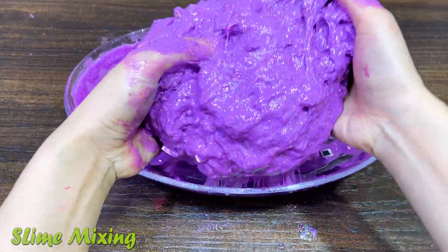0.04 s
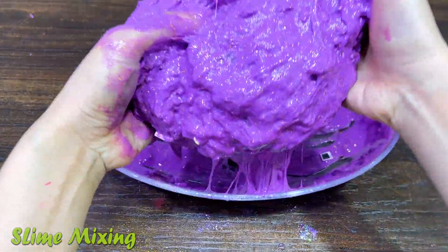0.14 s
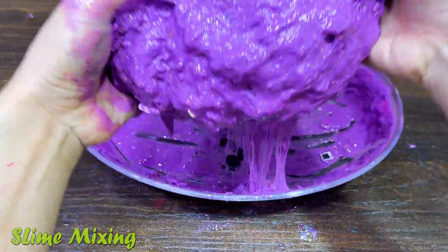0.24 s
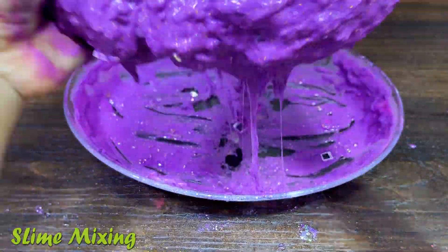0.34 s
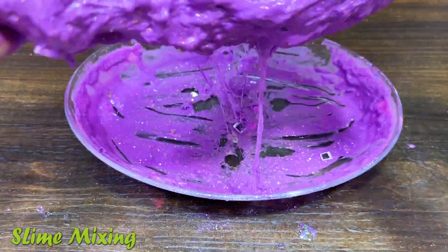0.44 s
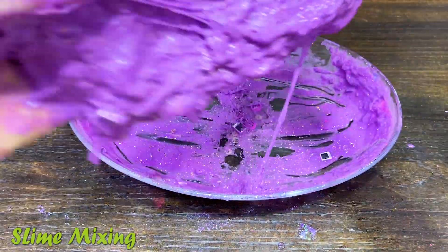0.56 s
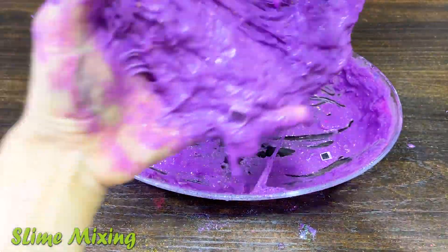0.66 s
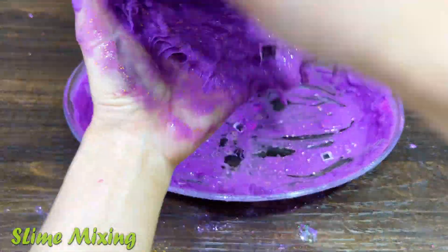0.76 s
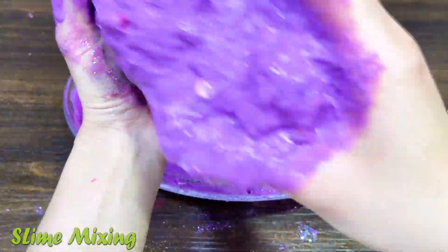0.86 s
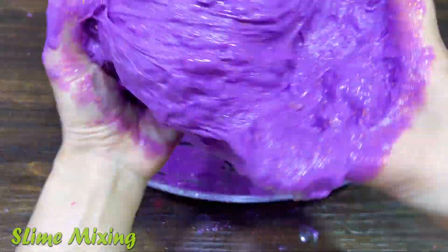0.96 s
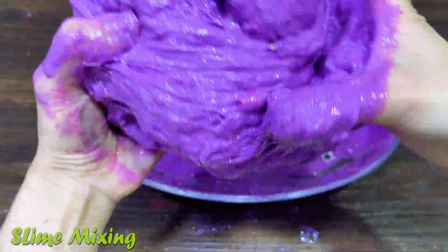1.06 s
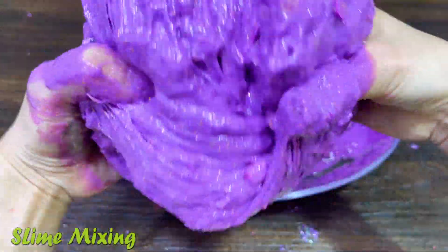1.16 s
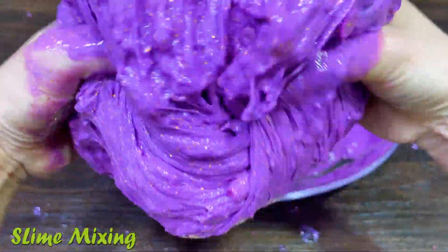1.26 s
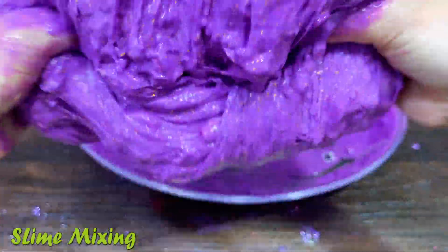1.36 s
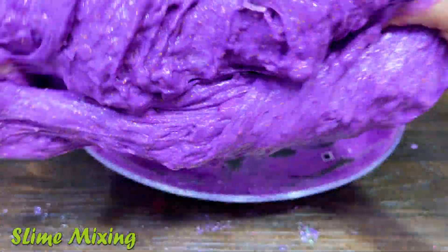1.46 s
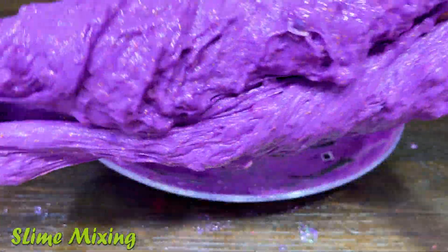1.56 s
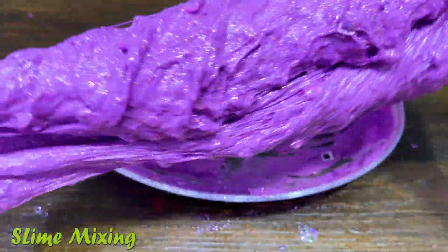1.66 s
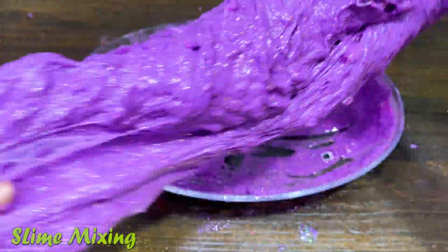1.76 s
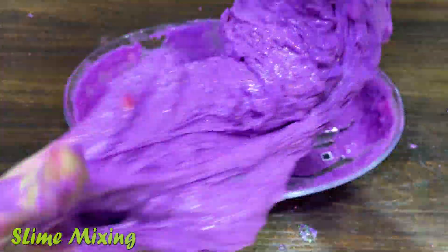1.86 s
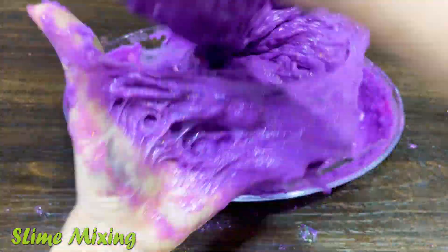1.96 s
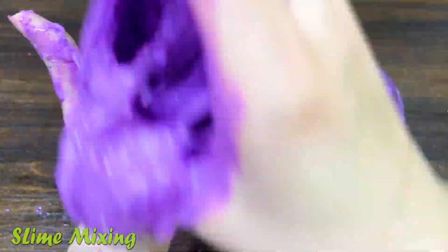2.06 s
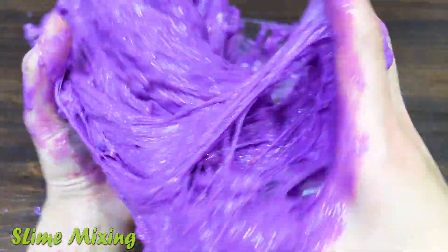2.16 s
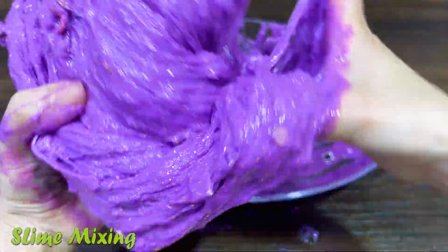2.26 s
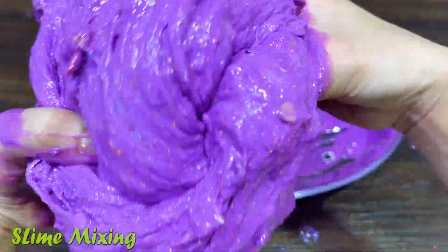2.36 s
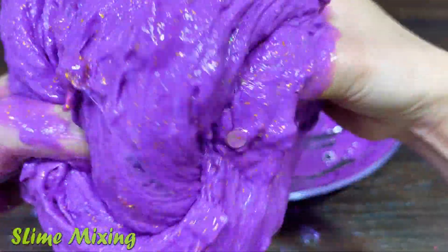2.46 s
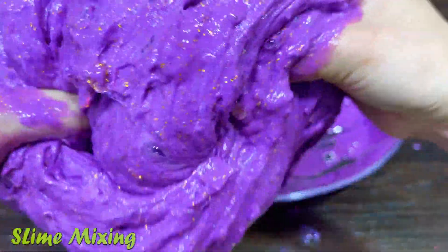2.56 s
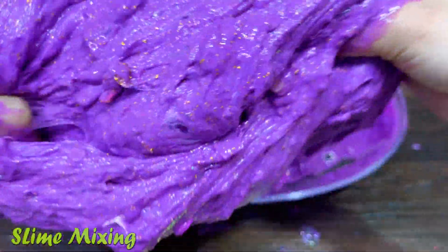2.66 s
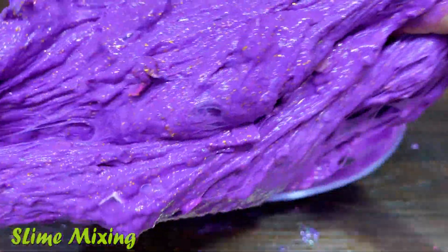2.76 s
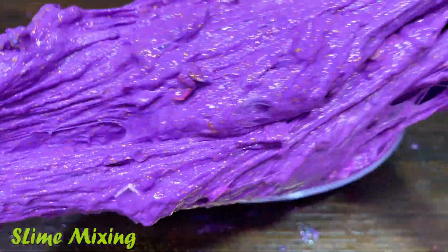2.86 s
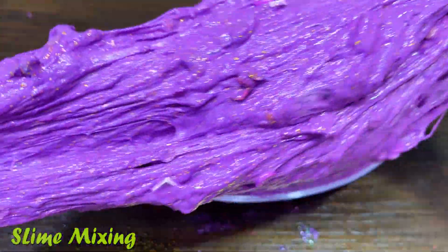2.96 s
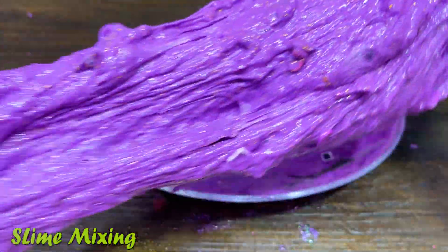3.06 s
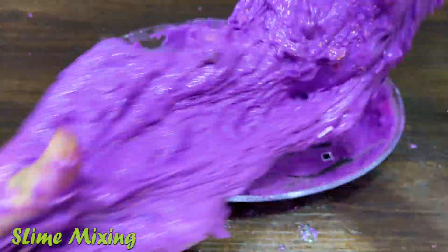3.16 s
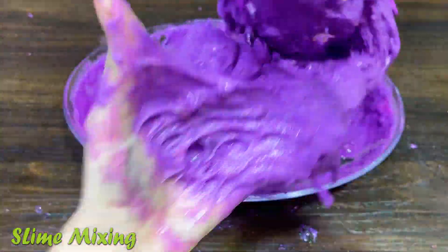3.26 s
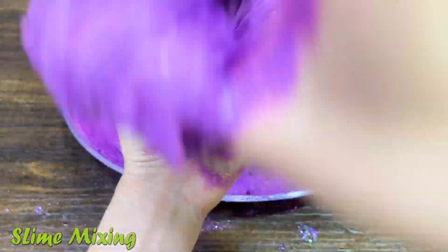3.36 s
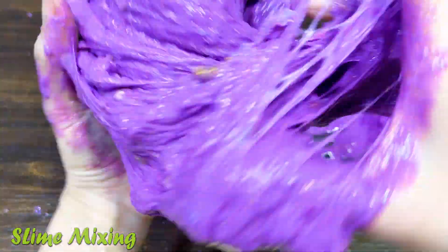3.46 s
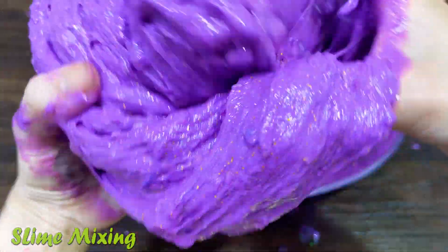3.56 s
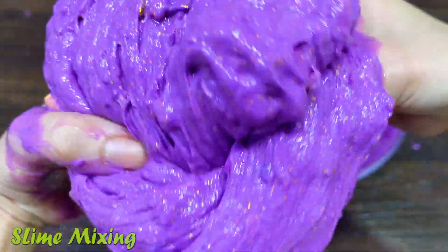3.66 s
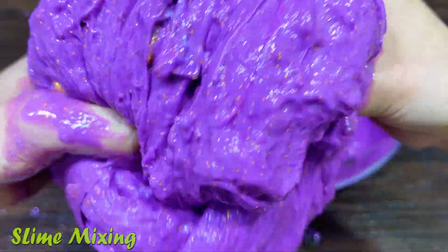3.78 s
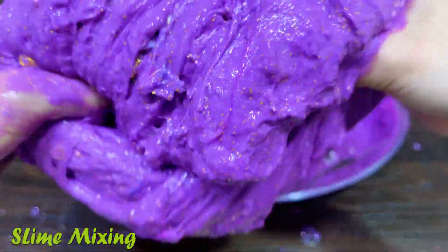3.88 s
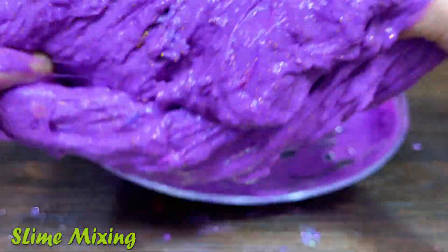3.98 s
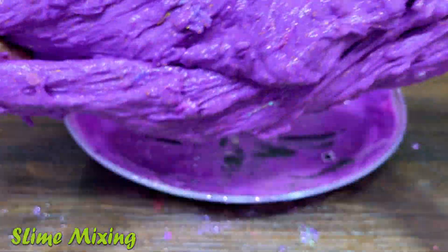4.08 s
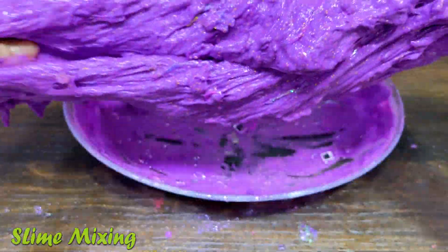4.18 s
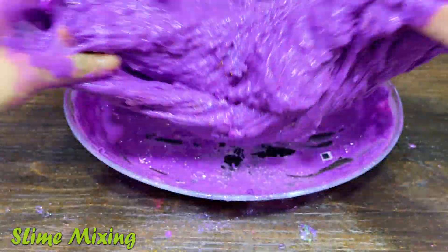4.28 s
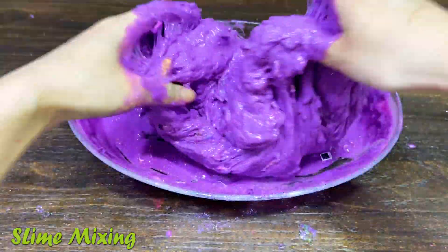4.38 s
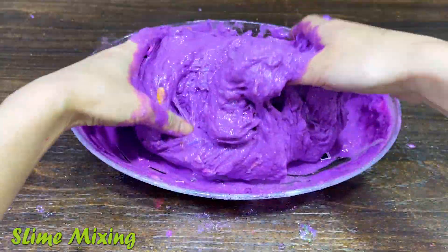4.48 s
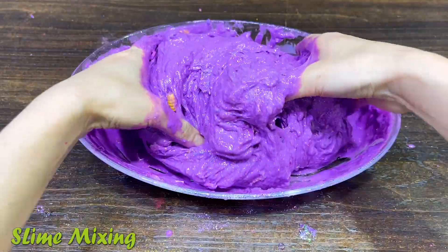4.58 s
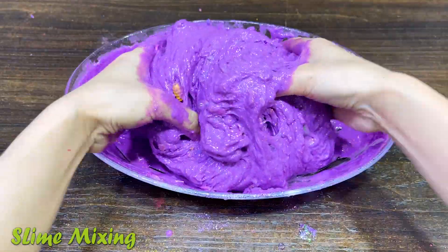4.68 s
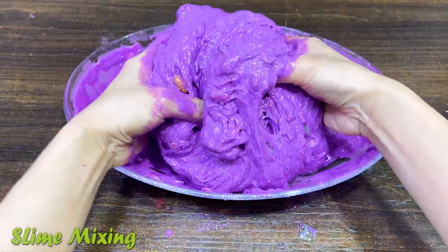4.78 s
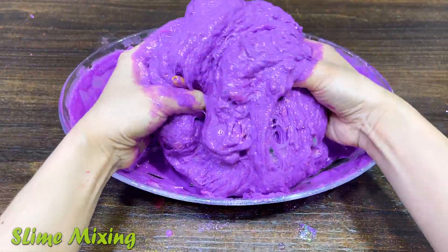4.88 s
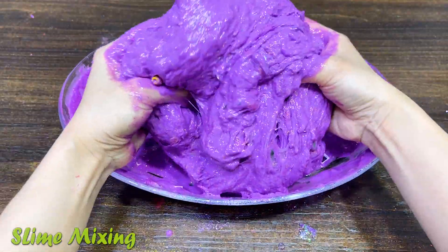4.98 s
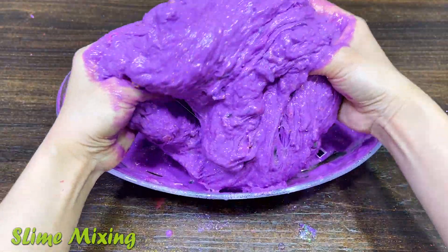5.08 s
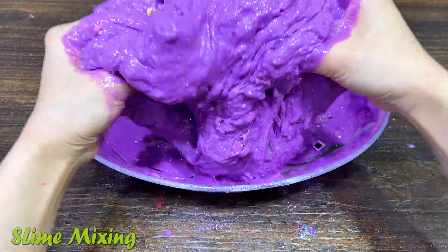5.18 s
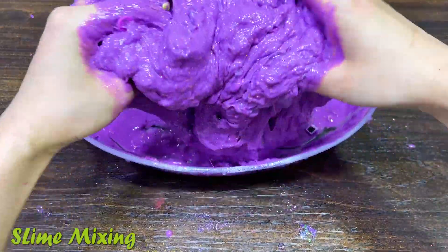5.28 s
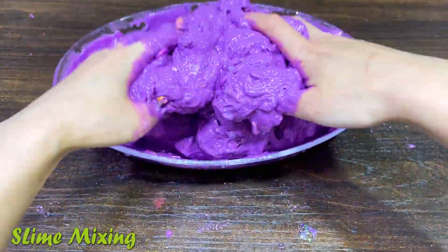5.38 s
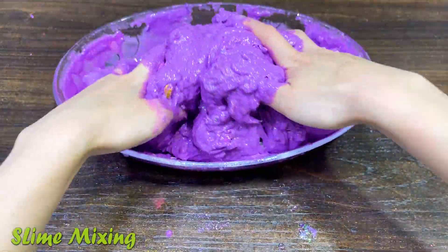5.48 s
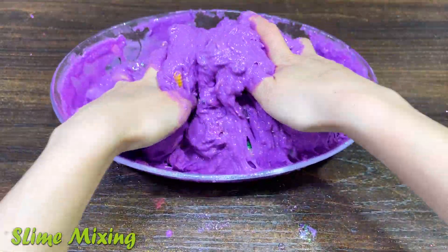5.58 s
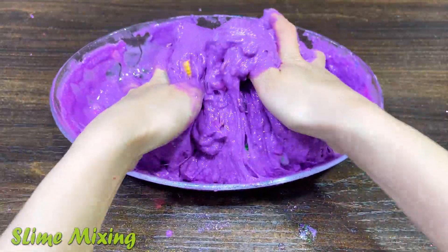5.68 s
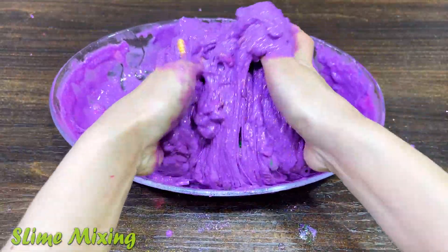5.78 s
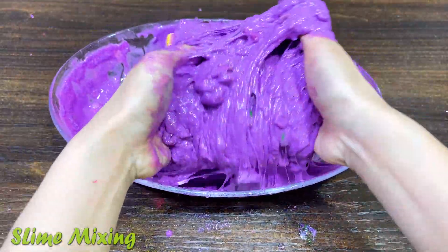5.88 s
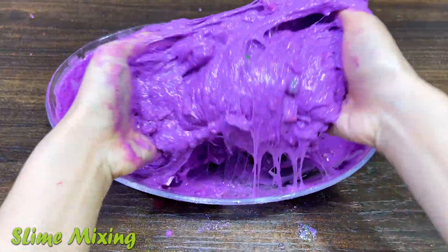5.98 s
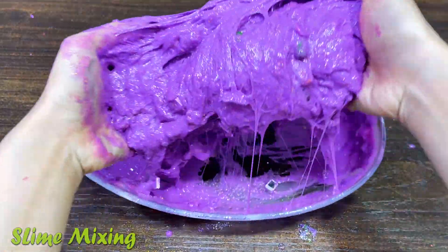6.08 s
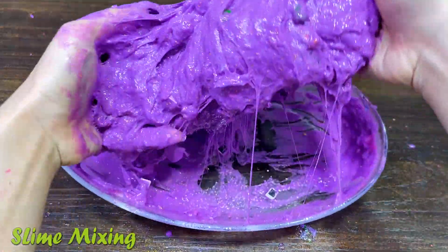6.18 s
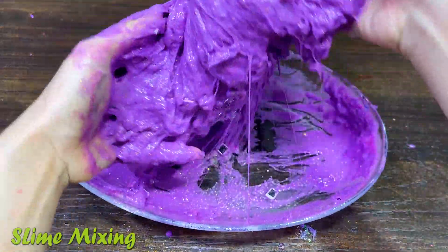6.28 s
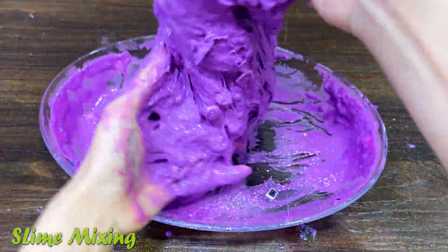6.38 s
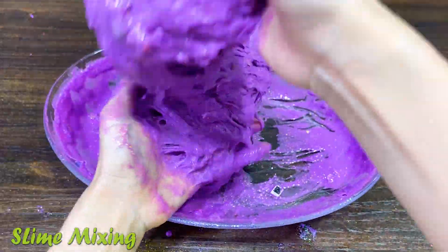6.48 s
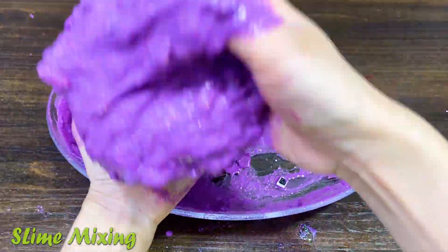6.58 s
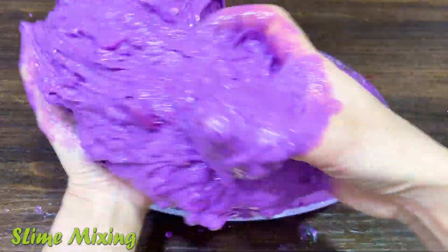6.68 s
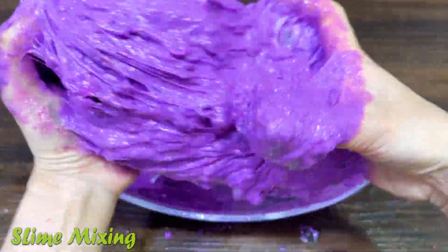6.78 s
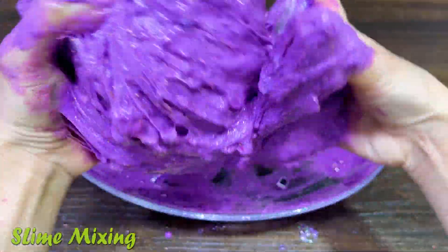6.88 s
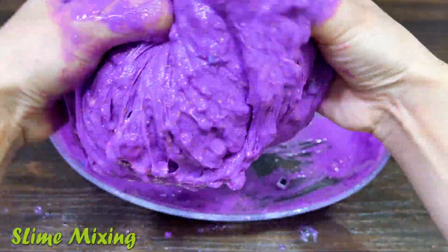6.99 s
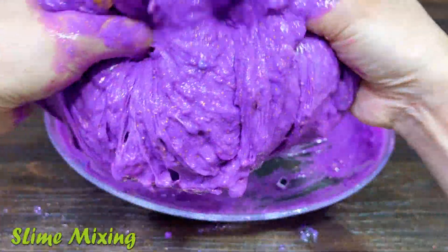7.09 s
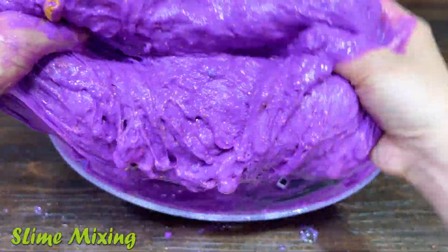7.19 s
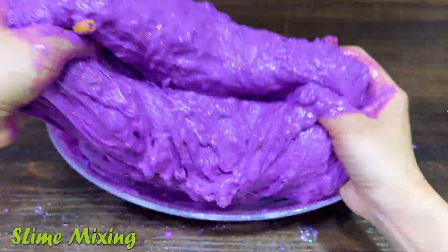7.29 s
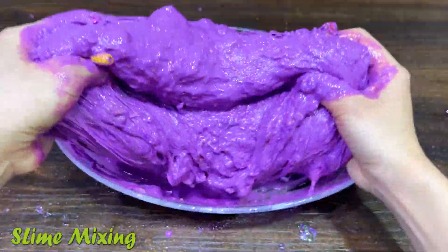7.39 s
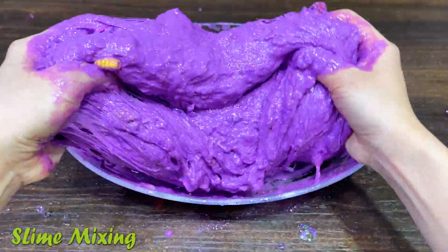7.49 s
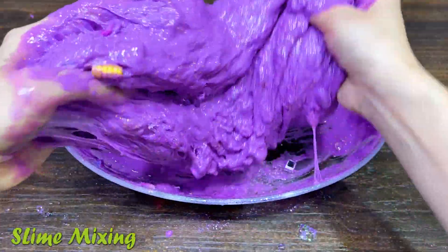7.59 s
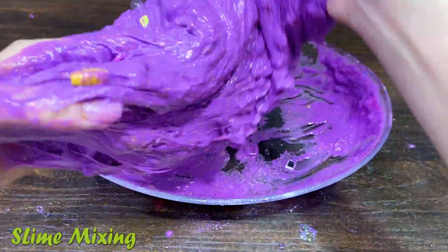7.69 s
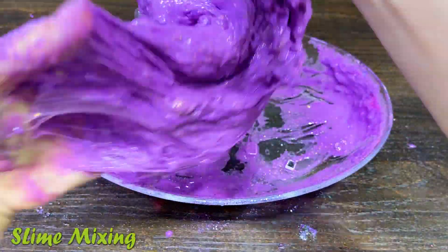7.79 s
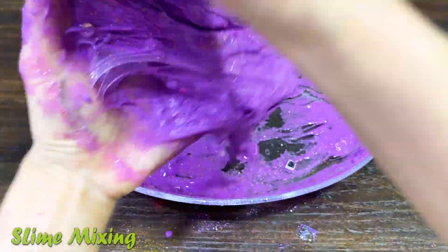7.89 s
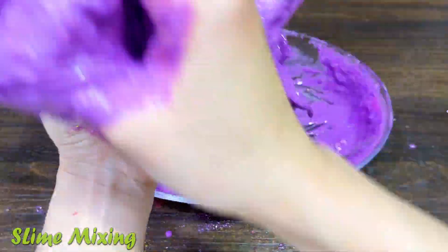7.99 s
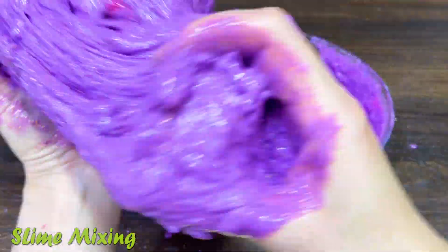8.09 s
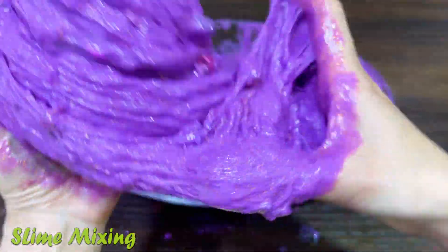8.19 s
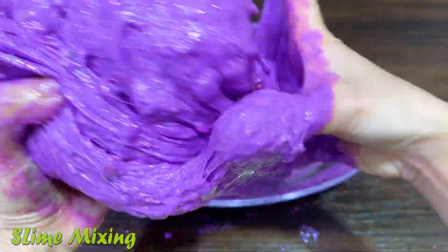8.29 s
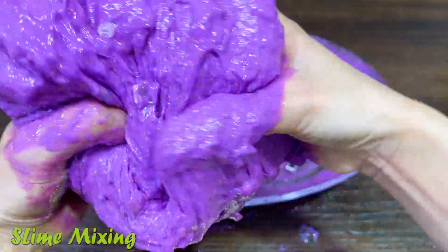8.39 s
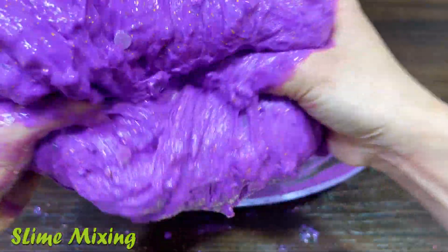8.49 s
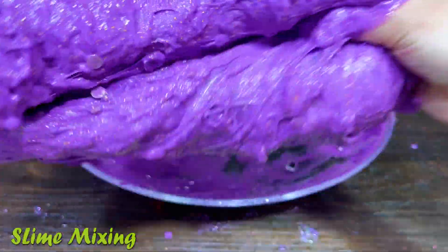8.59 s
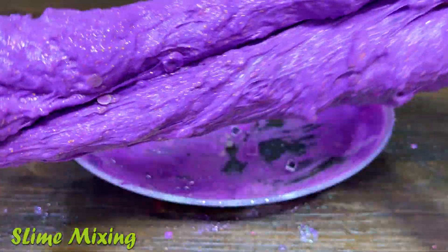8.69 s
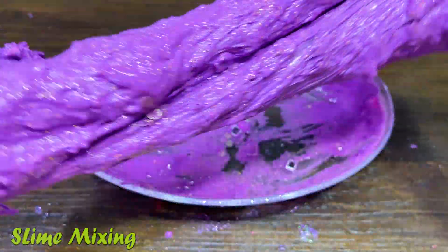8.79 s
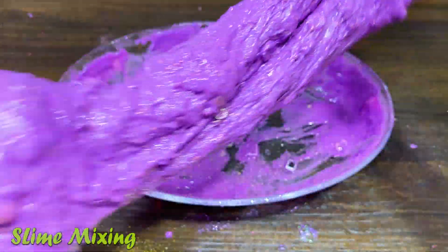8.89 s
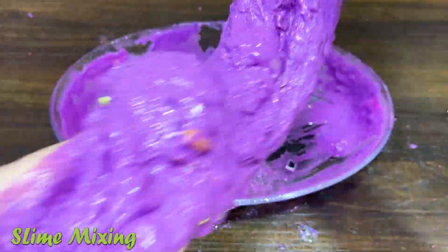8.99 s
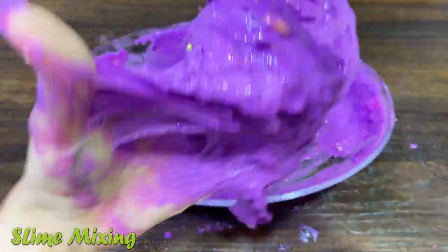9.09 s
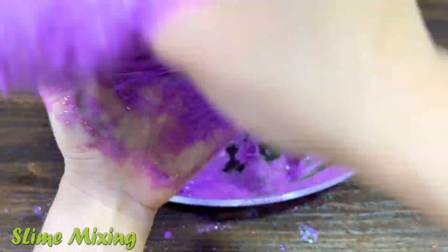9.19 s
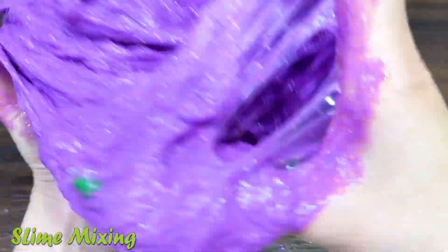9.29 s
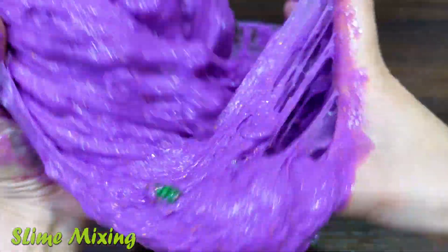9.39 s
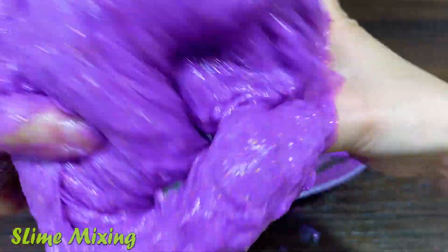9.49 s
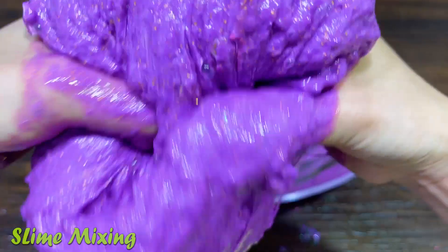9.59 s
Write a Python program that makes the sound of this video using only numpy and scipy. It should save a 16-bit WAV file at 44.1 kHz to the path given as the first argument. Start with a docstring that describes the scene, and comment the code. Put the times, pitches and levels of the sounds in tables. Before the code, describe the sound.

Close, sticky slime crackles, squelches and pops as it is kneaded, with dull thumps and a couple of loud plate clatters.

```python
"""A sticky crackle over a dull squelch: two hands stretch, fold and squeeze slime on a plate, close by.
Air pockets burst with loud snaps and ring as cavity resonators; tearing films and strands add noise.
The plate is pulled up, knocks on the wooden table and rocks, ringing in its damped modes, and buzzes
as slime peels off it. Lumps thump the table, short hollow notes drop in pitch, a small room answers."""
import sys
import numpy as np
from scipy import signal
from scipy.fft import rfft, irfft, next_fast_len
from scipy.io import wavfile
from scipy.ndimage import uniform_filter1d, map_coordinates

SR = 44100
rng = np.random.default_rng(int(sys.argv[2]) if len(sys.argv) > 2 else 0)


def inscribe(sig):
    """Save sig as 16-bit PCM at rate SR to the path in sys.argv[1].

    A 1-D sig is mono; a 2-D sig holds one channel per row.
    Samples are clipped to [-1, 1] before scaling.
    """
    pcm = np.round(np.clip(np.atleast_2d(sig).T, -1, 1) * 32767)
    wavfile.write(sys.argv[1], SR, pcm.astype(np.int16))


N = 425565
CLOCK = np.arange(N) / SR


def amp(db):
    """Amplitude ratio of a level in decibels."""
    return 10 ** (np.asarray(db) / 20)


def along(points, hz):
    """Interpolation of (f/Hz, value) points on a logarithmic frequency axis."""
    f, value = np.transpose(points)
    return np.interp(np.log(hz + 1), np.log(f + 1), value)


def unit_rms(x):
    """Normalisation to a mean power of 1."""
    return x / np.sqrt(np.mean(x ** 2) + 1e-20)


def wobble(rate):
    """Smooth random modulation: a spline through `rate` knots a second."""
    return map_coordinates(rng.standard_normal(int(N * rate / SR) + 4), [CLOCK * rate])


def filtered(x, response):
    """Linear filtering: the spectrum times a complex frequency response."""
    size = next_fast_len(N + SR // 2)
    return irfft(rfft(x, size) * response(np.fft.rfftfreq(size, 1 / SR)), size)[..., :N]


def placed(times, shapes, pan_db):
    """Superposition of short sounds, one a row, each panned by a left-right level difference."""
    at = (np.round(times * SR).astype(int)[:, None] + np.arange(shapes.shape[1])).ravel()
    channels = [shapes * amp(side * pan_db / 2)[:, None] for side in (1, -1)]
    return np.array([np.bincount(at, channel.ravel(), N + SR)[:N] for channel in channels])


def rings(hz, cycles, seconds):
    """Damped oscillations, one a row, whose envelopes peak after `cycles` periods."""
    turns = hz[:, None] * np.arange(round(seconds * SR)) / SR
    return np.sin(2 * np.pi * turns) * turns / cycles * np.exp(1 - turns / cycles)


def rush(spectrum, coherence, lumps_db, rate):
    """Partly coherent stereo noise of rms 1, made lumpy by amplitude modulation."""
    mid, side = filtered(rng.standard_normal((2, N)), lambda hz: amp(along(spectrum, hz)))
    angle = np.arccos(coherence) / 2
    pair = np.cos(angle) * mid + np.sin(angle) * np.array([side, -side])
    return unit_rms(pair * amp(lumps_db * wobble(rate)))


def grains(count, hz, octaves, cycles, spread_db, seconds):
    """Clustered shot noise of rms 1: tiny damped oscillations, few of them large."""
    time_rank, size_rank = rng.random((count, 2)).T
    detune, pan = rng.standard_normal((count, 2)).T
    cumulative_rate = np.cumsum(amp(5 * wobble(25)))
    times = np.interp(time_rank, cumulative_rate / cumulative_rate[-1], CLOCK)
    pitch = np.clip(hz * 2 ** (octaves * detune), 100, SR / 2.6)
    size = amp(-spread_db * np.log(1 - .985 * size_rank))
    return unit_rms(placed(times, size[:, None] * rings(pitch, cycles, seconds), 3 * pan))


def strokes(rows, attack_s, sag_db_per_s, release_db_per_s):
    """Envelopes with a linear rise and an exponential decay that steepens after the hold."""
    gain = np.zeros(N)
    for start, hold, db in rows:
        t = np.clip(CLOCK - start, 0, None)
        released = np.clip(t - hold, 0, None)
        gain += np.clip(t / attack_s, 0, 1) * amp(db - sag_db_per_s * t - release_db_per_s * released)
    return gain


def kneading_db(layer):
    """Slow amplitude envelope that the kneading gives the crackle or the squelch."""
    # course of the kneading: t/s, crackle level/dB, squelch level/dB
    effort = [(0.0, -55.5, -59.5), (0.29, -60.5, -50), (0.62, -66, -69.5), (1.53, -53, -54.5),
              (1.801, -55, -63.5), (2.23, -57, -65), (2.741, -51, -53), (3.44, -57.5, -71.5),
              (3.84, -54.5, -55), (4.46, -54, -60.5), (4.94, -54, -52.5), (5.0, -50, -49.5),
              (6.15, -53.5, -53), (6.29, -59.5, -63), (8.01, -60, -66), (8.6, -55.5, -57.5),
              (9.11, -60, -64.5), (9.65, -55.5, -55.5)]
    times, crackle_db, squelch_db = np.transpose(effort)
    return np.interp(CLOCK, times, {"crackle": crackle_db, "squelch": squelch_db}[layer])


def rest_db(fade_s=.015):
    """The excitation weakens, and the level dips, while the hands rest."""
    # pauses: t/s, duration/s, depth/dB
    rests = [(0.292, .08, 17.5), (0.73, 0.055, 5.5), (3.127, 0.043, 11), (3.332, 0.042, 11),
             (3.672, .038, 17), (4.247, 0.029, 13), (4.329, 0.056, 16), (4.582, 0.033, 10), (5.167, 0.1, 5),
             (5.499, 0.026, 10.5), (5.684, 0.018, 6), (6.353, 0.11, 12.5), (7.298, 0.086, 9.5),
             (7.583, 0.046, 18.5), (9.166, 0.08, 5.5)]
    level_db = np.zeros(N)
    for start, length, depth_db in rests:
        inside_s = np.minimum(CLOCK - start, start + length - CLOCK)
        level_db -= depth_db * np.clip(inside_s / fade_s + .5, 0, 1)
    return level_db


def crackle():
    """Shot noise of countless tiny bursting pockets, over the fizz of tearing film."""
    # spectrum of tearing film: f/Hz, relative spectral level/dB
    film = [(1000, -21.5), (2500, 1), (4000, -2), (9000, -11), (16500, -0.5)]
    ticks = grains(count=6000, hz=8500, octaves=.8, cycles=.7, spread_db=4.8, seconds=.002)
    fizz = rush(film, coherence=.75, lumps_db=6, rate=85)
    return amp(kneading_db("crackle") + rest_db()) * (ticks + fizz)


def squelch():
    """Heavily damped cavities: larger pockets cave in dully inside the paste."""
    # spectrum of the paste: f/Hz, relative spectral level/dB
    paste = [(100, -19.5), (200, -6.5), (330, 0), (450, -2.5), (900, -17), (1500, -8), (3000, -33.5)]
    gulps = grains(count=6000, hz=1700, octaves=.7, cycles=.45, spread_db=4.5, seconds=.003)
    smear = rush(paste, coherence=.9, lumps_db=5.5, rate=28)
    return amp(kneading_db("squelch") + .99 * rest_db()) * (amp(-3.5) * gulps + amp(2) * smear)


def table_rumble():
    """Forced vibration: the arms shake the table; it swells after knocks and thumps and during rocking."""
    # spectrum of the table: f/Hz, relative spectral level/dB
    wood = [(20, -54), (35, -37), (60, -0.5), (100, -0.5), (170, -1), (300, -58.5)]
    # swells of low rumble: t/s, hold/s, level/dB
    rumbles = [(0.15, 0.058, -42.5), (4.86, 0.28, -24.5), (5.55, 0.34, -46), (8.42, 0.72, -61)]
    squelch_db = kneading_db("squelch")
    shake = amp(-64 + .25 * (squelch_db - squelch_db.mean()))
    swells = strokes(rumbles, attack_s=.011, sag_db_per_s=18, release_db_per_s=143.5)
    return (shake + swells) * rush(wood, coherence=.9, lumps_db=4.5, rate=9)


def thuds():
    """Impact excitation: lumps and the rocking plate thump the table, higher thumps with more slap."""
    # blows on the table: t/s, level/dB, f/Hz
    blows = [(0.043, -20.5, 105), (0.056, -25, 96), (0.085, -36.5, 89), (1.999, -47.5, 84),
             (3.401, -42.5, 160), (3.62, -33.5, 103), (4.611, -26, 157), (4.859, -24, 170),
             (4.89, -21.5, 96), (4.925, -17.5, 128), (4.959, -24.5, 68.9), (4.995, -17.5, 151.2),
             (5.028, -23.5, 78.6), (5.059, -18.5, 147), (5.098, -14, 104), (5.171, -18, 121.3),
             (5.221, -33.5, 67.6), (5.399, -30, 190), (5.421, -27.5, 190), (5.744, -24.5, 213),
             (6.16, -25, 220), (6.499, -34, 82), (7.406, -33.5, 81.4), (8.423, -30.5, 88.8),
             (8.658, -39, 77)]
    times, db, hz = np.transpose(blows)
    swell = np.arange(round(.12 * SR)) / SR / .0099
    noise = rng.standard_normal((len(times), len(swell)))
    dull_noise = uniform_filter1d(uniform_filter1d(noise, size=48), size=48)
    slap = amp(8.5) * dull_noise * swell * np.exp(1 - swell)
    slap -= uniform_filter1d(slap, size=260)  # high-pass
    thump = rings(hz, cycles=.65, seconds=.12) + (hz[:, None] / 160) ** 2 * slap
    return placed(times, amp(db)[:, None] * thump, rng.normal(1, 2.5, len(times)))


def snaps():
    """Cavity resonance: the skin cracks, a spray follows, and the open pocket rings for a few cycles."""
    # bursting pockets: t/s, level/dB, pocket f/Hz, relative crack level/dB
    bursts = [(0.0617, -29, 7490, -9.5), (0.4482, -32, 7820, -1), (0.5611, -35, 4650, -1.5),
              (0.8082, -30, 6290, -23.5), (0.8125, -25, 6260, -20), (0.8416, -25, 5020, -20),
              (0.9224, -23, 2890, -23), (0.9548, -23.5, 8200, -18), (1.061, -19, 1970, -12),
              (1.0838, -22.5, 5990, -11), (1.1467, -14.5, 2550, -47), (1.2201, -28, 5440, -14.5),
              (1.2379, -27.5, 5930, -7.5), (1.405, -24, 4600, -28.5), (1.62, -10.5, 4170, -3.5),
              (1.6347, -22, 7560, -1), (1.689, -27.5, 2720, -10), (1.7173, -19.5, 5150, -11.5),
              (1.7246, -27.5, 8600, 0), (1.8462, -29.0, 8570, -4.5), (2.0441, -29, 1280, -8),
              (2.171, -25.5, 7900, -6), (2.2528, -19.5, 7400, -10.5), (2.2571, -28.5, 3960, -16),
              (2.363, -27, 3030, -7.5), (2.4011, -22, 1890, -21), (2.5028, -26.0, 6890, 0),
              (2.5423, -23, 8790, -2), (2.5923, -26.5, 7020, -4), (2.9106, -26.0, 2800, -5),
              (2.918, -24, 2800, -5), (3.1819, -30, 7600, 1.5), (3.2049, -23, 8250, -2),
              (3.2619, -27, 5400, -6.0), (3.2801, -26, 2410, -11), (3.2849, -23.5, 2350, -18),
              (3.6148, -21.5, 2200, -5.5), (3.7135, -17.5, 1295, -6), (3.7383, -19, 1830, -30.0),
              (3.7838, -27.5, 1060, -3), (3.9514, -33.5, 2430, -3), (4.0543, -28.5, 7470, -6),
              (4.0745, -23, 4000, -7), (4.1056, -24, 1680, -27.5), (4.2913, -30.0, 1530, -10.5),
              (4.3001, -24, 4840, -22.5), (4.3357, -27.5, 5700, -16.5), (4.402, -32, 2500, -0.5),
              (4.4381, -26, 5710, -14), (4.4692, -44, 6040, -12), (4.6085, -21, 5270, -24),
              (4.7427, -23.5, 7920, -6.5), (4.7853, -28.5, 3340, -16), (4.8225, -28, 2480, -22.5),
              (4.8616, -22, 2390, -9), (4.898, -16, 1700, -8), (5.0598, -16, 7410, -13),
              (5.2611, -24.5, 6400, -3), (5.2896, -18.5, 4600, -8.5), (5.3221, -20, 2350, -28.0),
              (5.368, -21, 1420, -10.0), (5.3797, -17, 1490, -10), (5.5387, -18, 2240, -8.0),
              (5.5573, -18.5, 8720, -3), (5.5625, -18, 2840, -19.0), (5.5796, -17, 1550, -19),
              (5.6555, -27.5, 5100, -25.0), (5.7218, -9, 2420, -11.0), (5.7499, -17.5, 2360, -4),
              (6.0147, -14.5, 3020, -12), (6.1438, -20, 900, -26.0), (6.1583, -7.5, 2050, -11.5),
              (6.226, -18, 2390, -13), (6.3144, -24, 3500, -36), (6.3625, -30.5, 4660, -4.5),
              (6.4746, -20.5, 8600, -12), (6.4908, -15, 1590, -7.5), (6.5719, -21.5, 1620, -6),
              (6.608, -22.5, 1260, -4.5), (6.6572, -20.5, 4350, -25.5), (6.6775, -23, 4240, -32.5),
              (6.8087, -29, 4800, -1.5), (6.8859, -24, 2100, -32), (7.0875, -21.5, 8600, -1.5),
              (7.1296, -25, 1430, -3), (7.1711, -24.0, 8790, -3), (7.1952, -30, 8100, 8),
              (7.1989, -18.5, 6900, -20), (7.2209, -24, 5040, -11), (7.2275, -26.5, 5940, 0),
              (7.2311, -25, 4820, -29), (7.3915, -13.5, 1510, -16.5), (7.3959, -17, 1460, -17),
              (7.4528, -17, 1490, -10), (7.5055, -16, 1260, -10.5), (7.6175, -31.5, 1290, -46),
              (7.6495, -34.5, 5700, -1), (7.6831, -23.5, 8790, -3), (7.703, -22.5, 2200, -9),
              (7.8037, -32.5, 3650, -10.5), (8.0828, -33, 7760, -1.0), (8.1508, -28, 2240, -13),
              (8.213, -26.5, 3120, -5), (8.2357, -29, 3270, -2.5), (8.4005, -20, 5000, -4),
              (8.4367, -18.5, 1450, -36), (8.598, -30, 3170, -27), (8.701, -26.5, 6780, -9.0),
              (8.7137, -24.5, 6700, -4), (8.795, -20.5, 1640, -26), (8.9403, -28.5, 5750, -20.0),
              (9.0118, -34, 3970, -9.5), (9.3889, -26, 6400, -1.5), (9.3916, -30, 8790, 2),
              (9.4368, -30, 1060, -3.5), (9.5478, -24.5, 8790, -1), (9.5825, -19, 1800, -16),
              (9.6136, -10.5, 8000, -1)]
    times, db, hz, bright_db = np.transpose(bursts)
    t = np.arange(SR // 50) / SR
    noise = rng.standard_normal((len(times), 2, len(t)))
    pan_db = .37 + 1.2 * noise[:, 0, 0]
    swell = t / .00062
    spray = swell ** 2 * np.exp(2 - 2 * swell) + amp(-9.5 - 60 * t / .022) * np.tanh(swell)
    pocket_share = np.sqrt(np.clip(1 - amp(2 * bright_db), .03, 1))  # what the crack leaves
    splash = amp(-3 + .15 * bright_db)[:, None] * noise[:, 0] * spray  # softer crack, purer note
    turns = hz[:, None] * t
    ring = np.sin(2 * np.pi * turns) * np.tanh(1.5 * turns) * amp(4 - 6 * turns)
    pocket = placed(times, (pocket_share * amp(db - 3))[:, None] * (ring + splash), pan_db)
    pocket = filtered(pocket, lambda f: 1j * f / (700 + 1j * f) / (1 + (f / 9000) ** 8))
    crack = placed(times, amp(db + bright_db - 1.5)[:, None] * noise[:, 1] * spray, pan_db)
    return pocket + filtered(crack, lambda f: 1 / (1 + (9000 / (f + 1)) ** 8))


def fizz_rushes():
    """Broadband noise in short rushes: the bright spray after the plate's slap, then tearing sheets."""
    # spectrum of the fizz: f/Hz, relative spectral level/dB
    spectrum = [(900, -14.5), (1500, -9), (2800, -4.5), (4500, -5), (9000, -4), (16500, -5.5)]
    # rushes of fizz: t/s, hold/s, level/dB
    rushes = [(0.15, 0.052, -40), (1.385, .05, -52.5), (1.62, 0.037, -50.5), (2.6, 0.49, -52.5),
              (3.645, 0.0074, -47), (3.735, 0.027, -43), (3.797, 0.0067, -43.5), (8.25, 0.013, -45),
              (8.7, 0.15, -55.5), (9.06, 0.023, -54.5)]
    ticks = grains(count=9000, hz=3500, octaves=.8, cycles=1.1, spread_db=3.5, seconds=.002)
    fizz = rush(spectrum, coherence=.8, lumps_db=3.5, rate=170)
    return strokes(rushes, attack_s=.005, sag_db_per_s=5.5, release_db_per_s=303.5) * (fizz + ticks)


def plate_knocks():
    """Modal ringing: each knock excites the plate's modes at new strengths; low modes build up later."""
    # the plate meets the table: t/s, level/dB, spectral tilt about 1 kHz/(dB per octave)
    impacts = [(0.1514, -2.5, -0.5), (0.1546, -5.5, -2), (0.178, -5, -1.5), (0.187, -10.5, -4),
               (0.218, -30.5, 2.5), (5.0903, -1.5, 1.5), (6.142, -21, -5), (6.159, -29, 7),
               (6.488, -31, -5), (7.411, -18, -3)]
    # modes of the plate: f/Hz, level/dB, T60/s
    plate_modes = [(220, -5, 0.031), (347, -3.5, 0.045), (554, 1, 0.018), (745, -1.5, 0.015),
                   (900, -6, 0.026), (1177, -10, 0.035), (1370, 4, 0.01), (1860, -2.5, 0.01),
                   (2040, 8, 0.0037), (3140, -13, 0.0097)]
    rocking = [(.259 + k * .0356, -38 - k * 2.2, -6) for k in range(7)]  # on its rim after the drop
    times, db, tilts_db = np.transpose(impacts + rocking)
    hz, mode_db, t60 = np.array(plate_modes).T[:, :, None]
    t = np.arange(SR // 4) / SR
    envelopes = amp(mode_db - 60 * t / t60) * (1 - np.exp(-t * hz / .8))
    ringing = []
    for tilt_db in tilts_db:
        strengths = amp(rng.normal(0, 1, hz.shape) + tilt_db * np.log2(hz / 1e3))
        sines = np.sin(2 * np.pi * (hz * t + rng.random(hz.shape)))
        ringing.append(np.sum(envelopes * strengths * sines, axis=0))
    noise = uniform_filter1d(rng.standard_normal((len(times), len(t))), size=5)
    rattle = .52 * amp(-60 * t / .023) * noise
    return placed(times, amp(db)[:, None] * (ringing + rattle), np.zeros(len(times)))


def hollow_notes(landing_hz=322.7, overshoot=1.6, fall_s=.0021, t60_s=.06):
    """Damped downward chirps: each hollow note starts high, drops within a cycle or two and dies."""
    # hollow notes: t/s, level/dB
    onsets = [(1.385, -35.5), (1.417, -39), (2.616, -43), (2.726, -37), (3.615, -34.5), (3.714, -28),
              (3.739, -32.5), (3.786, -39), (3.801, -38.5), (3.862, -37), (3.949, -41), (4.612, -29),
              (4.858, -27), (5.381, -31.5), (5.592, -29.5), (5.619, -33), (5.751, -29), (5.958, -34),
              (6.194, -37), (6.492, -39), (7.014, -47.5), (7.043, -54), (7.09, -42), (7.198, -44.5),
              (8.252, -39.5), (8.598, -39)]
    times, db = np.transpose(onsets)
    t = np.arange(SR // 12) / SR
    hz = landing_hz * 2 ** rng.normal(0, .15, (len(times), 1))
    turns = hz * (t + overshoot * fall_s * (1 - np.exp(-t / fall_s)))
    note = np.sin(2 * np.pi * turns) * amp(4 - 60 * t / t60_s) * np.tanh(t / .0017)
    return placed(times, amp(db)[:, None] * note, rng.normal(0, 1.5, len(times)))


def peels(snapping, contact_db=-41):
    """Mechanical coupling: strands let go and set the plate buzzing; snaps during a peel ring it too."""
    # sheets peel apart or off the plate: t/s, hold/s, level/dB
    pulls = [(3.615, 0.0026, -37.5), (3.735, 0.045, -43), (4.86, 0.066, -42), (5.09, 0.052, -30),
             (5.26, 0.2, -42.5), (5.535, 0.027, -37), (5.58, 0.082, -30.5), (5.72, 0.095, -34.5),
             (6.01, 0.14, -41), (6.15, 0.069, -33.5), (6.485, 0.18, -36.5), (6.59, 0.025, -37),
             (7.39, 0.016, -28.5), (7.445, 0.071, -30.5)]
    hiss = rush([(100, 0), (16000, -.1)], coherence=.87, lumps_db=3.5, rate=120)
    strands = grains(count=4000, hz=5640, octaves=.81, cycles=.23, spread_db=2, seconds=.00023)
    gain = strokes(pulls, attack_s=.0016, sag_db_per_s=48.5, release_db_per_s=403.5)
    coupling = np.tanh(gain / amp(contact_db))
    buzz = unit_rms(plate_buzz(hiss + amp(2.5) * strands))
    return gain * buzz + amp(-9.5) * plate_buzz(coupling * snapping)


def plate_buzz(force):
    """Driven resonances of the plate, in two groups; the slime damps now one, now the other."""
    # resonances under a peel: f/Hz, bandwidth/Hz, level/dB
    bands = [(320.3, 130, 9.5), (705, 920, 3.5), (1316, 920, 1.5), (2070, 480, 1.5), (2490, 110, -1),
             (3120, 80, 0), (3860, 69, -1), (5456, 72, 1), (5970, 59, 2), (8250, 990, -4.5),
             (12010, 510, -4.5)]

    def response(f, group):
        total = amp(-13) / (1 + 1j * f / 3000)  # broad floor between the resonances
        for k, (hz, width, db) in enumerate(bands):
            if k // 2 % 2 == group:
                total += (-1) ** k * amp(db) * 1j * f * width / (hz * hz - f * f + 1j * f * width)
        return total

    one, other = filtered(force, lambda f: [[response(f, 0)], [response(f, 1)]])
    balance_db = 3.5 * wobble(22)
    return amp(balance_db) * one + amp(-balance_db) * other


def room(x, delay_samples=250):
    """Reverberation: convolution with a noise tail in which each frequency dies at its own rate."""
    # reverberation time: f/Hz, T60/s
    decay = [(100, 0.78), (400, 0.18), (1500, 0.18), (5000, 0.091), (14000, 0.013)]
    hz, t, spectra = signal.stft(rng.standard_normal((2, SR // 2)), SR, nperseg=256)
    tail = signal.istft(spectra * amp(-60 * t / along(decay, hz)[:, None]), SR, nperseg=256)[1]
    delayed = np.pad(x.mean(axis=0), (delay_samples, 0))[None]
    return signal.fftconvolve(delayed, tail / np.linalg.norm(tail[0]), axes=1)[:, :N]


def scene():
    """Superposition of plate and slime, each with its reverberation, and the dry sound of the table."""
    snapping = snaps()
    plate = plate_knocks() + peels(snapping) + hollow_notes()
    slime = snapping + crackle() + fizz_rushes() + squelch()
    return plate + amp(-10) * room(plate) + slime + amp(-13) * room(slime) + thuds() + table_rumble()


def record(dry, top_hz=16670):
    """Two microphone ports of unlike depth colour the treble and shift its phase; peaks clip."""
    # response common to both ports: f/Hz, level/dB
    colour = [(20, -27.5), (60, -0.5), (120, -1.5), (9000, 1), (11100, 6.5), (12800, 6), (14900, 9.5),
              (16000, -8.5), (16600, -24.5)]
    # left port over right: f/Hz, level difference/dB
    imbalance = [(100, 0), (1500, 2), (6000, 4.5), (13000, 0.5)]
    # lead of the left port: f/Hz, phase/rad
    lead = [(30, 0), (2400, 0), (4000, .6), (7200, .6), (8800, 0), (9900, .9), (11400, -.2), (12500, -2.2),
            (13400, -3.14), (13900, -3.7), (15300, -6.2)]

    def ports(hz):
        left = amp(along(imbalance, hz) / 2) * np.exp(.5j * along(lead, hz))
        return amp(along(colour, hz)) * np.array([left, 1 / left])

    clipped = np.clip(filtered(dry, ports), -1, 1)
    return filtered(clipped, lambda hz: hz < top_hz)


dry = scene()
out = record(dry)
inscribe(out)
```